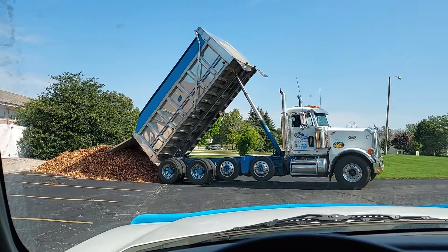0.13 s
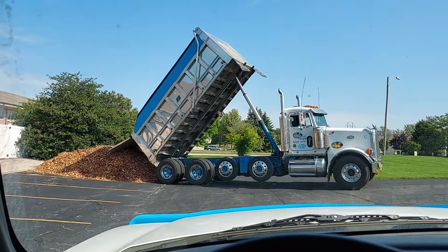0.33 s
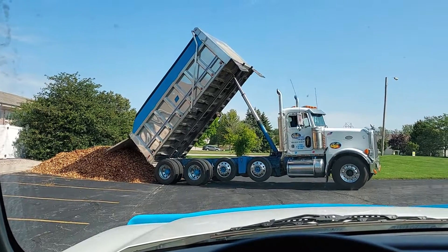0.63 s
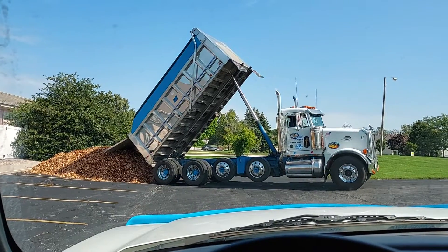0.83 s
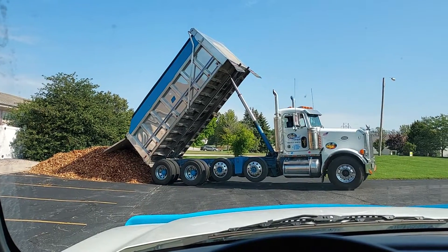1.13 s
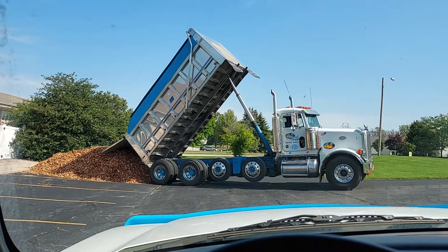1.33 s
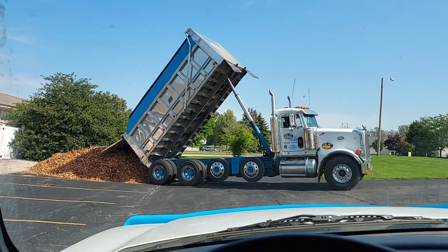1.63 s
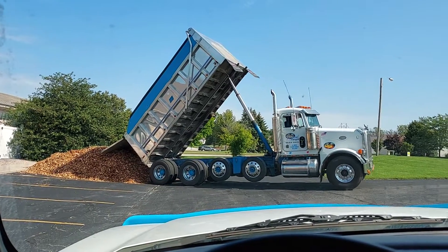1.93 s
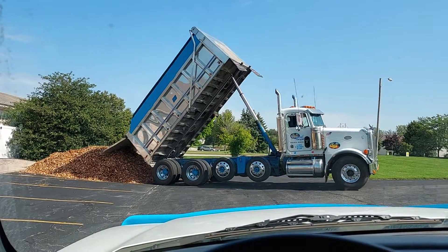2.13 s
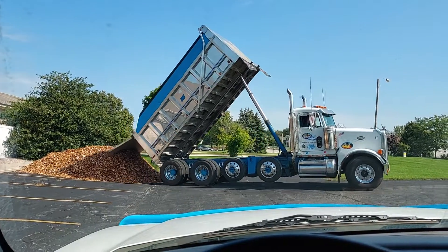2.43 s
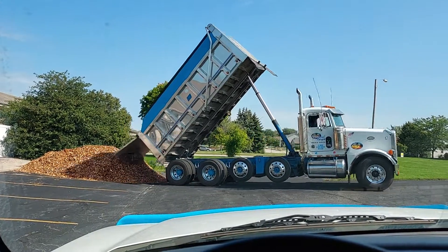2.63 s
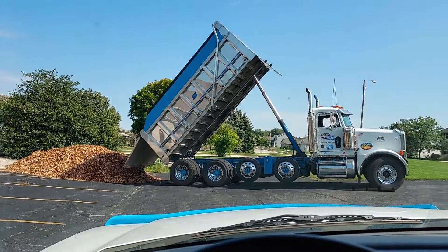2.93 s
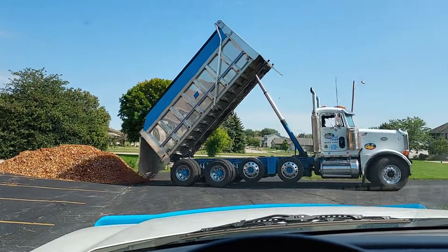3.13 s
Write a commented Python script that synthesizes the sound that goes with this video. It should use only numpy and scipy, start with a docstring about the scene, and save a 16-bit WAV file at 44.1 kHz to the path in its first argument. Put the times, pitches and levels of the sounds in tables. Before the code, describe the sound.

Heavy diesel truck rumbles, releases a burst of brake air, labours under load and picks up speed.

```python
"""A dump truck's diesel takes up the load, sags, knocks brightly and picks up speed, pulling away from its pile.
It is heard from a parked, idling car with the left window open. Firing-rate harmonics make the exhaust and
the car's hum; noise pulsed at each firing makes rumble, clatter and knock; jittered tones make belt and turbo.
Before the pull, the air valve whistles and hisses and the brakes let go in one blast of shaped noise, with
the linkage's bumps as decaying modes."""
import sys
import numpy as np
from scipy import signal
from scipy.fft import rfft, irfft
from scipy.io import wavfile

SR = 44100
rng = np.random.default_rng(int(sys.argv[2]) if len(sys.argv) > 2 else 0)


def master_out(mix):
    """Clip the mix to full scale and print it as 16-bit PCM to the path in sys.argv[1]."""
    frames = np.transpose(np.atleast_2d(mix))
    ceiling = np.clip(frames, -1, 1)
    pcm = np.round(ceiling * 32767).astype(np.int16)
    wavfile.write(sys.argv[1], SR, pcm)


N = 145089
TIME = np.arange(N) / SR
WINDOW_LAG_S = 0.00043  # the left side hears the truck first


def from_db(db):
    """Decibel law: amplitude grows tenfold every 20 dB."""
    return 10 ** (np.asarray(db) / 20)


def rms_one(x):
    """Normalisation: scale to unit root-mean-square."""
    return x / np.sqrt(np.mean(x ** 2) + 1e-20)


def curve(rows):
    """Linear interpolation: a value at every sample from (time, value) rows."""
    return np.interp(TIME, *np.transpose(rows))


def entering(times, levels_db):
    """Amplitude envelope: levels joined linearly in dB, silent before the first point."""
    return from_db(np.interp(TIME, times, levels_db, left=-np.inf))


def pan(db):
    """Interaural level difference: left and right gains, positive towards the left."""
    return from_db(np.array([[db], [-db]]) / 2)


def drift(rate_hz):
    """Low-passed chance: noise through a double real pole, with a spread of 1."""
    step = 40  # samples between computed values
    pole = np.exp(-2 * np.pi * rate_hz * step / SR)
    noise = rng.standard_normal(N // step + 2002)
    slow = signal.lfilter([1], [1, -2 * pole, pole * pole], noise)[2000:]  # drop the filter's start
    return np.interp(np.arange(N) / step, np.arange(len(slow)), rms_one(slow))


def colour(x, spectrum):
    """Spectral shaping: gains joined over log frequency, falling steeply below the first point; rms 1."""
    hz, db = np.transpose(spectrum)
    f = np.maximum(np.fft.rfftfreq(N, 1 / SR), 1)
    gain = from_db(np.interp(np.log(f), np.log(hz), db))
    low_cut = np.minimum(f / hz[0], 1) ** 4
    return rms_one(irfft(rfft(x) * gain * low_cut, N))


def rings(x, modes):
    """Modal resonance: parallel two-pole resonators, each at its own level."""
    out = 0
    for hz, width_hz, db in modes:
        radius = np.exp(-np.pi * width_hz / SR)
        poles = [1, -2 * radius * np.cos(2 * np.pi * hz / SR), radius * radius]
        out = out + from_db(db) * rms_one(signal.lfilter([1, 0, -1], poles, x))
    return out


def air(direct):
    """Partial coherence: a direct share of noise reaches the right later, the rest scatters in the cabin."""
    white = rng.standard_normal((3, N))
    lag = int(round(WINDOW_LAG_S * SR))
    arriving = np.array([white[0], np.roll(white[0], lag)])
    return np.sqrt(direct) * arriving + np.sqrt(1 - direct) * white[1:]


def partial(turns, unsteady, rate_hz):
    """Random modulation: a sine of rms 1 whose strength and phase waver."""
    wobble = 1 + unsteady * (drift(rate_hz) + 1j * drift(rate_hz))
    return rms_one(np.real(wobble * np.exp(2j * np.pi * (turns + rng.random()))))


def firings(turns, decay, depth, uneven_db):
    """Pulse modulation: six unequal cylinders each swell and die within a share of the cycle."""
    cylinders = from_db(uneven_db * rng.standard_normal(size=6))
    age = (turns % 1) / decay
    burst = age * np.exp(1 - age) * cylinders[turns.astype(int) % len(cylinders)]
    return rms_one(1 + depth * burst)


def puff(start, attack, hold, t60):
    """Exponential decay: a squared rise, a hold, then a fall of 60 dB in t60 (all in seconds)."""
    rise = np.clip((TIME - start) / attack, 0, 1) ** 2
    falling_s = np.maximum(TIME - start - attack - hold, 0)
    return rise * from_db(-60 * falling_s / t60)


def squeal(hz, spread_hz):
    """Frequency modulation: a steady-strength tone roughened by fast pitch jitter that differs on each side."""
    jitter = spread_hz * np.array([drift(200), drift(200)])
    return np.sqrt(2) * np.sin(2 * np.pi * np.cumsum(hz + jitter, axis=1) / SR)


def boom(turns):
    """Cabin resonance: a deep tone, stronger on the right and out of step on the left."""
    lead_turns = np.array([[0.17], [0]])
    return np.sqrt(2) * np.sin(2 * np.pi * (turns + lead_turns)) * pan(-6)


# Levels in the next three tables are relative to CAR_DB.
# Level of the car's boom: start_s, level_db
CAR_BOOM_LEVEL = [(0, 2), (2.1, 2), (2.75, -1), (3.27, 0.7)]
# Overtones of the idle: multiple of the firing rate, level_db, left_right_db, unsteadiness (share)
CAR_OVERTONES = [(2, -16.5, -11.5, 0.039), (4, -32, 22, 0.28), (5, -25.5, 1.5, 0.39), (6, -32, 0, 0.33)]
# A fan in the car: start_s, level_db
CAR_FAN_LEVEL = [(0, -47), (.5, -35.5), (1.8, -34), (3.27, -41)]
CAR_HZ, CAR_DB = 45.35, -22.5  # mean firing rate (Hz) and reference level (dB)
FAN_HZ = 564.4
WHINE_MULTIPLE, WHINE_DB = 12, -35  # engine-bay whine: multiple of the firing rate, dB re CAR_DB


def car_idle():
    """Harmonic series and beating: the firing rate booms with overtones; a whine beats against a fan."""
    turns = CAR_HZ * TIME + 0.012 * drift(2)
    hum = from_db(curve(CAR_BOOM_LEVEL)) * boom(turns)
    for multiple, db, pan_db, unsteady in CAR_OVERTONES:
        hum = hum + from_db(db) * pan(pan_db) * partial(multiple * turns, unsteady, rate_hz=6)
    whine = from_db(WHINE_DB) * partial(WHINE_MULTIPLE * turns, unsteady=0.98, rate_hz=9.4)
    fan = from_db(curve(CAR_FAN_LEVEL)) * partial(FAN_HZ * TIME, unsteady=1, rate_hz=8)
    return from_db(CAR_DB) * (hum + (whine + fan) * pan(5))


# Bumps of the brake linkage: start_s, level_db
LINKAGE_BUMPS = [(.623, -42), (.663, -35.5)]
# Modes of the linkage: pitch_hz, level_db (re the bump)
LINKAGE_MODES = [(305, 4.5), (350, 0), (440, -4.5)]


def clunks():
    """Modal decay: the brake linkage springs back with a light bump and a heavier one."""
    out = 0
    for start, bump_db in LINKAGE_BUMPS:
        envelope = puff(start, attack=0.008, hold=0, t60=0.1)
        for hz, mode_db in LINKAGE_MODES:
            out = out + from_db(bump_db + mode_db) * envelope * np.sin(2 * np.pi * hz * (TIME - start))
    return out


# Whistles of the air valve: start_s, hold_s, pitch_hz, level_db
VALVE_WHISTLES = [(0.0039, 0.03, 11790, -53.5), (0.042, 0.022, 11756, -50.5), (0.025, .115, 15600, -57),
                  (0.53, .025, 11780, -64)]
# Relative spectra of the leak, the blast and its fuller body: frequency_hz, density_db (per Hz)
LEAK_SPECTRUM = [(2000, -8), (4500, -1.5), (8000, -16), (10000, -2), (13000, -4), (15500, -2)]
BLAST_SPECTRUM = [(900, -24), (2200, -2), (4600, 3), (7750, -6), (10000, -3), (13500, -1.5), (15500, -5.5)]
BODY_SPECTRUM = [(280, -11), (550, 6), (730, -18), (930, 2), (1300, -8), (2400, -4), (4000, -11),
                 (8000, -33)]


def air_brakes():
    """Jet noise: thin valve whistles and a soft leak, then the release blast, which fills out as it goes."""
    leak = from_db(-48) * colour(air(direct=0.21), LEAK_SPECTRUM)
    leak = leak * puff(start=0.064, attack=0.061, hold=0.046, t60=0.22)
    blast = from_db(-38) * colour(air(direct=0.12), BLAST_SPECTRUM)
    blast = blast * puff(start=0.535, attack=0.069, hold=0.072, t60=0.47)
    body = from_db(-40) * colour(air(direct=0.35), BODY_SPECTRUM)
    body = body * puff(start=0.565, attack=0.069, hold=0.012, t60=0.63)
    whistles = 0
    for start, hold, hz, db in VALVE_WHISTLES:
        tone = partial(hz * TIME, unsteady=0.35, rate_hz=34)
        whistles = whistles + from_db(db) * puff(start, attack=0.0045, hold=hold, t60=0.064) * tone
    return (leak + blast + body) * pan(6) + whistles


# The turbo's whistle: start_s, level_db, pitch_hz
TURBO_WHISTLE = [(2.3, -61, 3790), (2.85, -59, 4010), (3.27, -58, 4280)]


def turbo():
    """Frequency glide: a breathy whistle climbs as the diesel gathers speed."""
    times, db, hz = np.transpose(TURBO_WHISTLE)
    return entering(times, db) * squeal(np.interp(TIME, times, hz), spread_hz=130) * pan(4)


# The belt's low chirp: start_s, level_db, pitch_hz
BELT_CHIRP = [(1.65, -74, 3110), (1.92, -52.5, 3130), (2.22, -51, 3220), (2.39, -51.5, 3120),
              (2.48, -55.5, 3280), (2.68, -52.5, 3330), (2.85, -58, 3180), (3.1, -80, 3130)]


def belt(turns):
    """Stick-slip: firings pulse a rough chirp, as from a slipping belt; a higher one joins as the load bites."""
    times, db, hz = np.transpose(BELT_CHIRP)
    low = entering(times, db) * squeal(np.interp(TIME, times, hz), spread_hz=90)
    high = from_db(-58) * puff(start=2, attack=0.025, hold=0.19, t60=0.2) * squeal(5210, spread_hz=50)
    return (low + high) * firings(turns, decay=0.17, depth=3, uneven_db=1) * pan(5)


# Level of the rattle: start_s, level_db
RATTLE_LEVEL = [(0, -44), (.9, -45), (1.8, -43.5), (2.1, -43), (2.5, -44), (3.27, -42.5)]
# Relative spectrum of the rattle: frequency_hz, density_db (per Hz)
RATTLE_SPECTRUM = [(190, -72), (330, 1), (420, -11), (553, -4.5), (618, -8.5), (715, -5), (1280, -7),
                   (1430, -8), (2350, -12.5), (7150, -31), (7880, -39.5), (11200, -37.5), (15500, -40)]
# Rings of the engine's metal: pitch_hz, width_hz, level_db (re the rattle)
BLOCK_MODES = [(1523, 22, -23.5), (1694, 19, -17), (2055, 37, -22.5)]


def clatter(turns):
    """Forced resonance: the diesel's mechanical rattle sets the block ringing."""
    drive = air(direct=0.56) * firings(turns, decay=0.55, depth=0.11, uneven_db=8)
    rattle = colour(drive, RATTLE_SPECTRUM) + rings(drive, BLOCK_MODES)
    return from_db(curve(RATTLE_LEVEL)) * rattle * pan(3)


# Load on the diesel, as the level of its knock: start_s, level_db
KNOCK_LEVEL = [(0, -62.5), (1.0, -59.5), (1.45, -58.5), (1.99, -55.5), (2.04, -50), (2.19, -48.5),
               (2.27, -53), (2.61, -51.5), (2.73, -49), (2.82, -50.5), (2.93, -53.5), (3.27, -57)]
# Relative spectrum of the knock: frequency_hz, density_db (per Hz)
KNOCK_SPECTRUM = [(900, -36), (2300, -4), (3000, 2), (3600, 0), (4200, 0.5), (5300, -3.5), (7000, -13.5),
                  (7900, -17), (11500, -14.5), (15500, -24)]


def knock(turns):
    """Impulsive combustion: firings add soft, bright, gritty knocks of uneven strength that follow the load."""
    grit_db = 1.7 * drift(250) + 0.5 * drift(15)
    pulses = firings(turns, decay=0.15, depth=0.4, uneven_db=1.5) * from_db(grit_db)
    return from_db(curve(KNOCK_LEVEL)) * colour(air(direct=0.18) * pulses, KNOCK_SPECTRUM) * pan(8.5)


# The truck's firing rate, which also paces belt, clatter and knock: start_s, pitch_hz
FIRING_RATE = [(0, 33.85), (.95, 34.0), (1.3, 41.3), (1.85, 42), (2.0, 40.6), (2.2, 37.4), (2.34, 33.8),
               (2.48, 32.6), (2.65, 36), (2.88, 46.3), (3.27, 48)]
# Level of the exhaust's fundamental: start_s, level_db
THROB_LEVEL = [(0, -32.5), (1.2, -69), (1.37, -40), (1.55, -52), (1.85, -33), (2.2, -25), (2.42, -42),
               (2.53, -36), (2.64, -24.5), (2.76, -33), (3.27, -41)]
# Surges of the exhaust: start_s, level_db
EXHAUST_SURGES = [(0, -36.5), (.33, -37.5), (.48, -34.5), (.57, -37.5), (1.7, -36.5), (2.47, -37),
                  (2.62, -31), (2.95, -36), (3.27, -35)]
# Overtones: multiple of the firing rate, level_db (re the surges, before the pipe's colour)
EXHAUST_OVERTONES = [(2, -6.5), (3, -3), (4, -9.5), (4.5, -8), (5, -4.5), (6, -10.5), (7, -12.5)]
# The pipe's colour on those overtones: frequency_hz, gain_db
PIPE_COLOUR = [(60, -1.5), (102, -2.5), (125, -0.5), (143, 0.5), (156, -3), (174, 0.5), (200, -9),
               (280, -7)]
# Relative spectrum of the exhaust gas noise: frequency_hz, density_db (per Hz)
RUMBLE_SPECTRUM = [(20, -34), (35, -53), (60, 10), (100, 0), (160, 7), (210, -0.5), (275, 2.5),
                   (320, -15.5), (450, -13), (900, -55)]


def exhaust(turns):
    """Source and filter: pipe-coloured overtones surge with gas noise; the fundamental beats with the car's."""
    throb = from_db(curve(THROB_LEVEL)) * boom(turns)
    tones = 0
    for multiple, db in EXHAUST_OVERTONES:
        pipe_db = np.interp(multiple * curve(FIRING_RATE), *np.transpose(PIPE_COLOUR))
        tones = tones + from_db(db + pipe_db) * partial(multiple * turns, unsteady=0.33, rate_hz=7.2)
    gas = air(direct=0.6) * firings(turns, decay=0.2, depth=2.1, uneven_db=3)
    rumble = from_db(-1) * colour(gas, RUMBLE_SPECTRUM)
    surge_db = curve(EXHAUST_SURGES) + 1.2 * drift(9)  # small random lumps
    return throb + from_db(surge_db) * (tones + rumble)


def scene():
    """Superposition: car and truck add; belt, clatter, knock and exhaust follow one firing rate."""
    turns = np.cumsum(curve(FIRING_RATE)) / SR
    brakes = clunks() + air_brakes()
    engine = turbo() + belt(turns) + clatter(turns) + knock(turns) + exhaust(turns)
    return car_idle() + brakes + engine


def record(dry):
    """Low-pass filtering: a steep elliptic filter cuts the top above 15750 Hz."""
    low_pass = signal.ellip(12, 0.1, 80, 15750, fs=SR, output="sos")  # order, ripple dB, stop-band dB, Hz
    return signal.sosfilt(low_pass, dry)


dry = scene()
out = record(dry)
master_out(out)
```